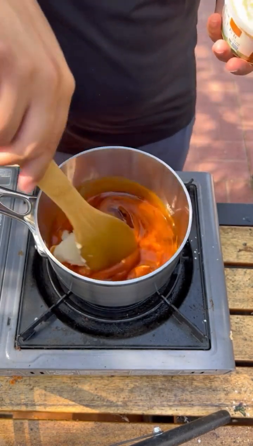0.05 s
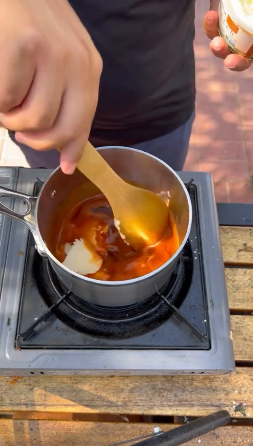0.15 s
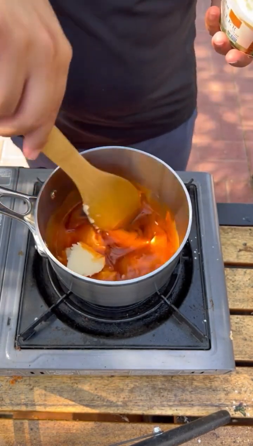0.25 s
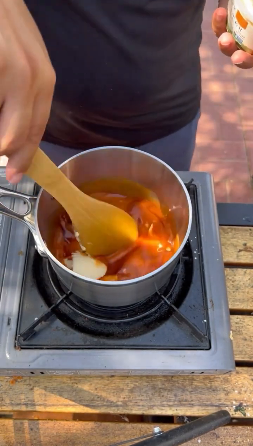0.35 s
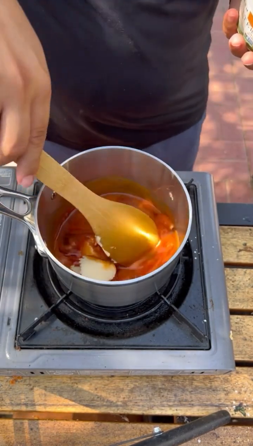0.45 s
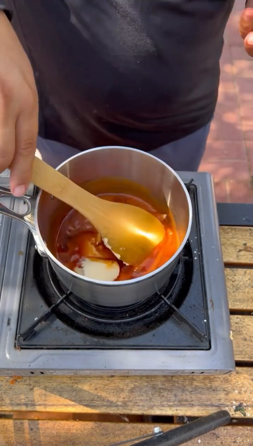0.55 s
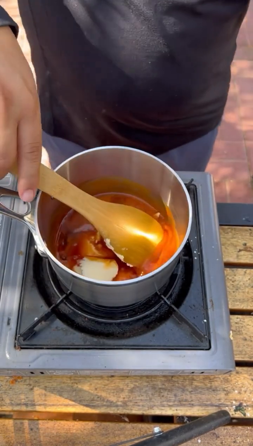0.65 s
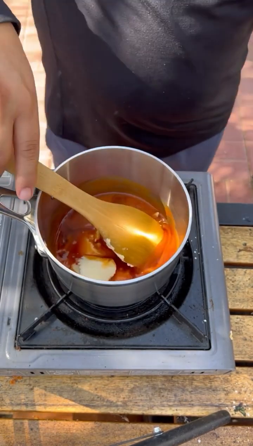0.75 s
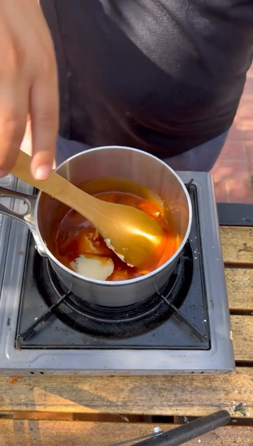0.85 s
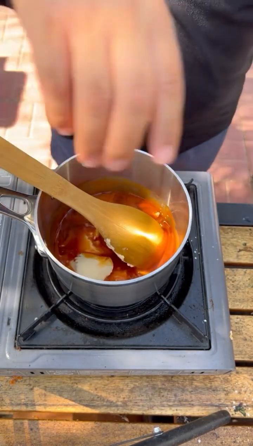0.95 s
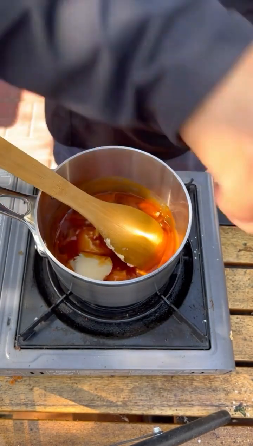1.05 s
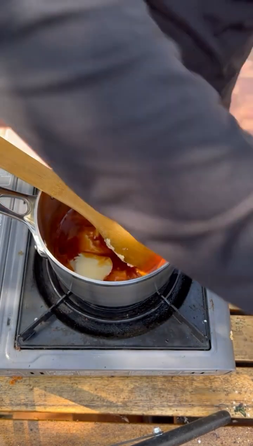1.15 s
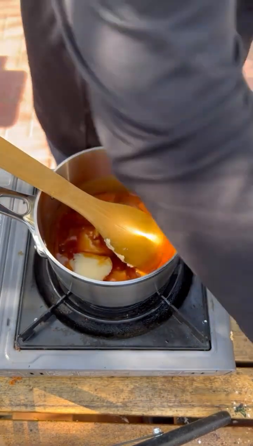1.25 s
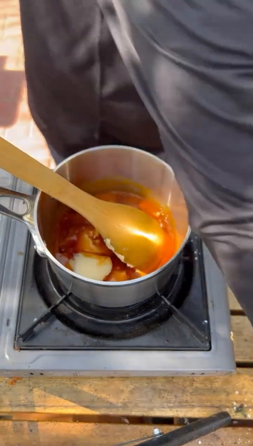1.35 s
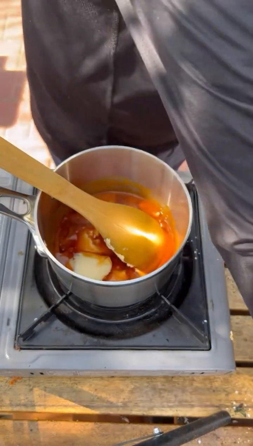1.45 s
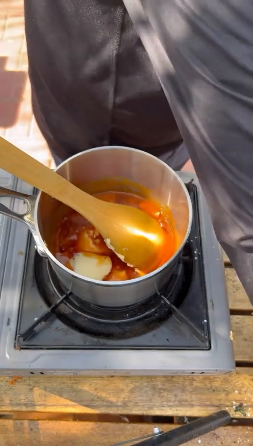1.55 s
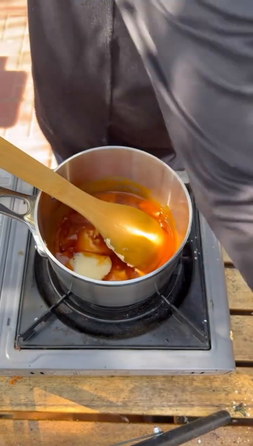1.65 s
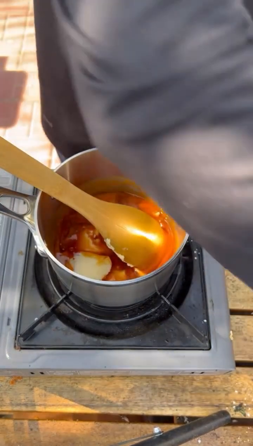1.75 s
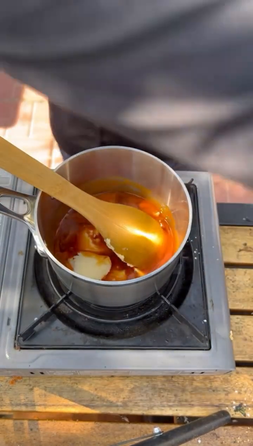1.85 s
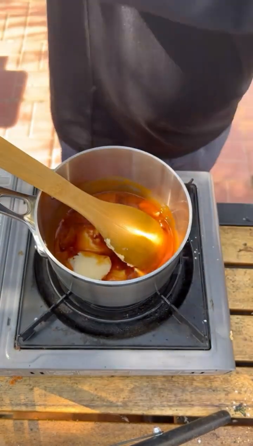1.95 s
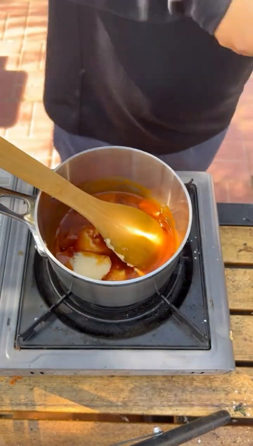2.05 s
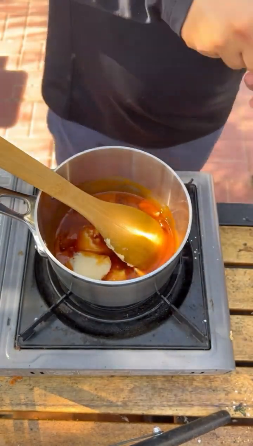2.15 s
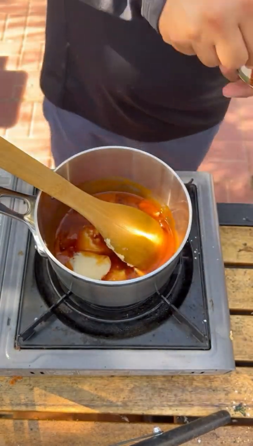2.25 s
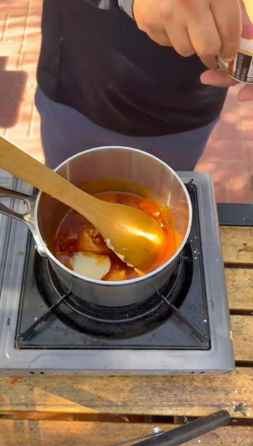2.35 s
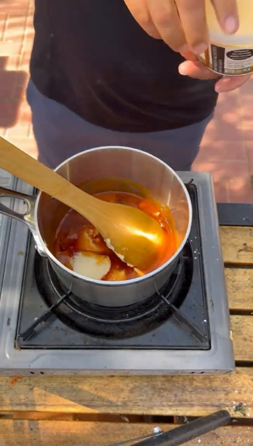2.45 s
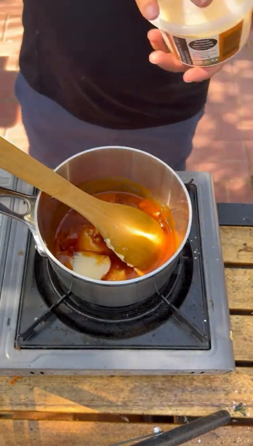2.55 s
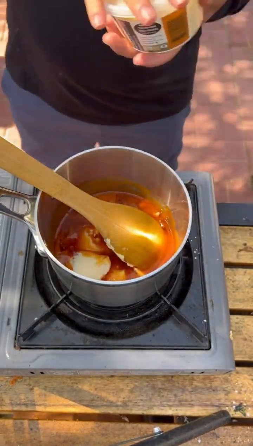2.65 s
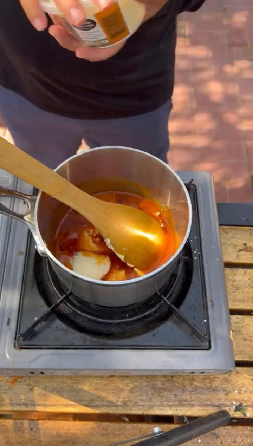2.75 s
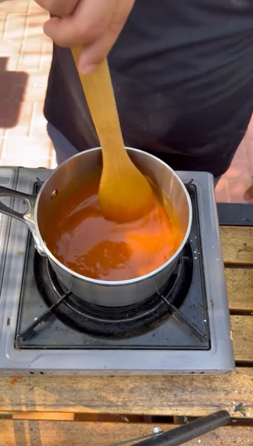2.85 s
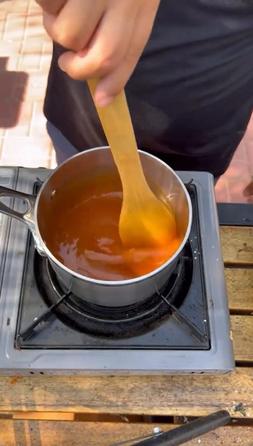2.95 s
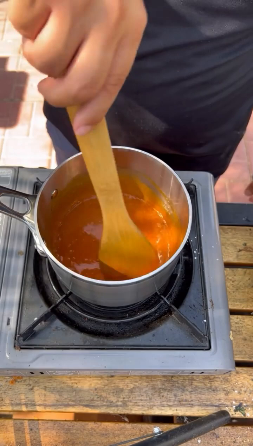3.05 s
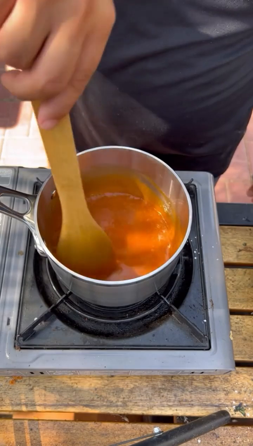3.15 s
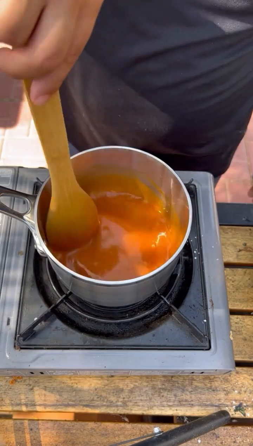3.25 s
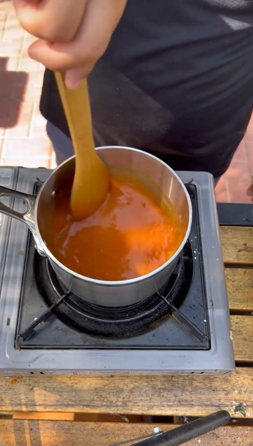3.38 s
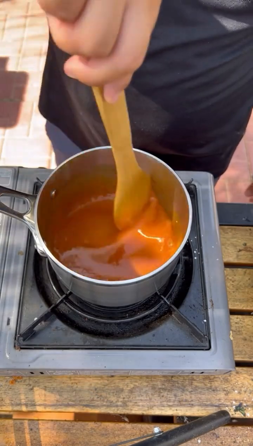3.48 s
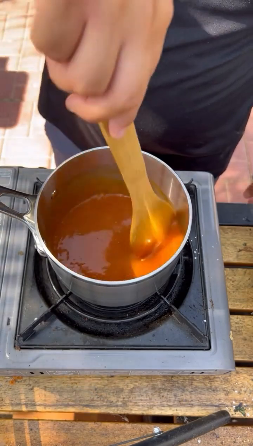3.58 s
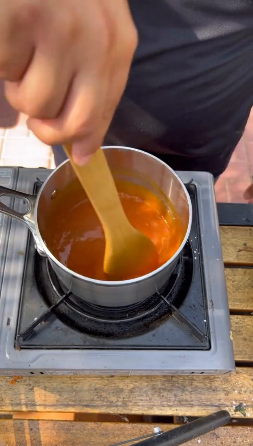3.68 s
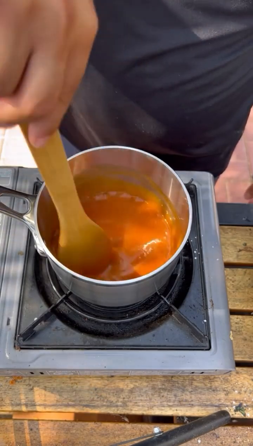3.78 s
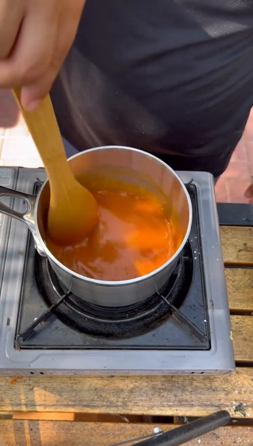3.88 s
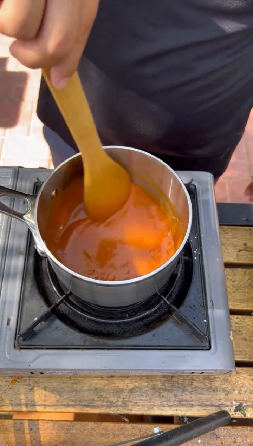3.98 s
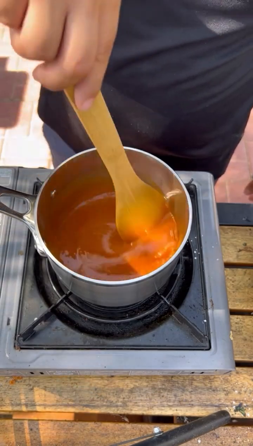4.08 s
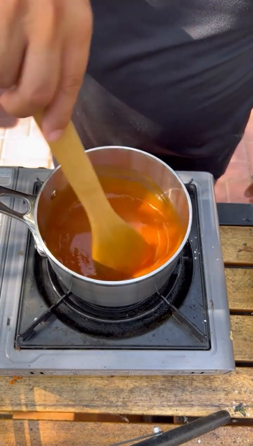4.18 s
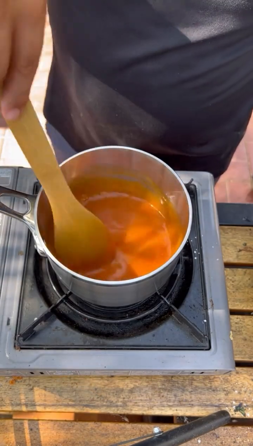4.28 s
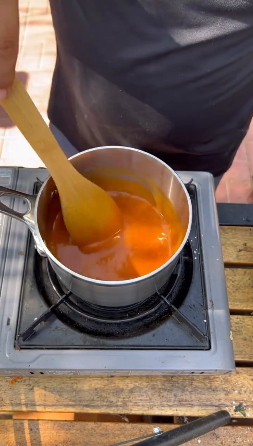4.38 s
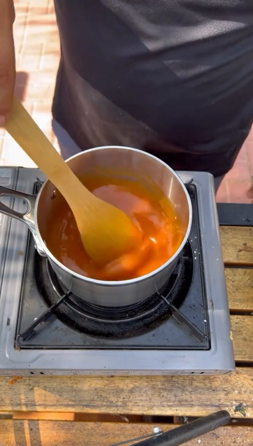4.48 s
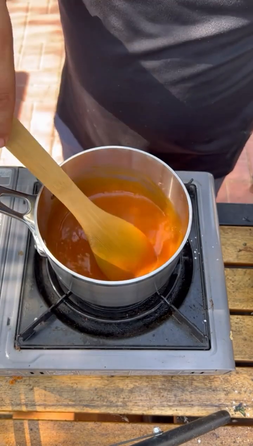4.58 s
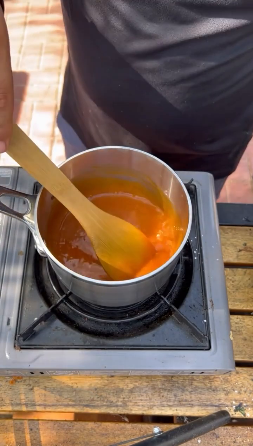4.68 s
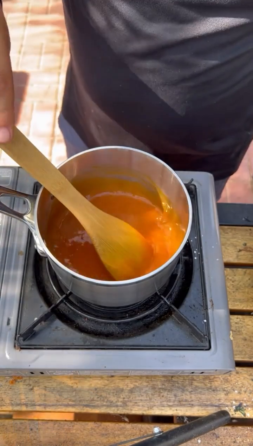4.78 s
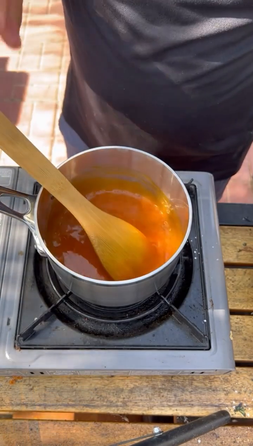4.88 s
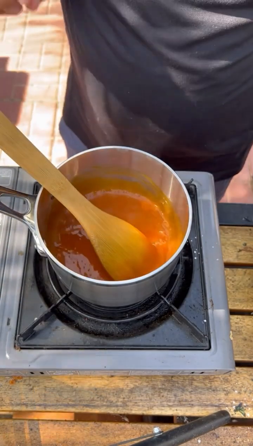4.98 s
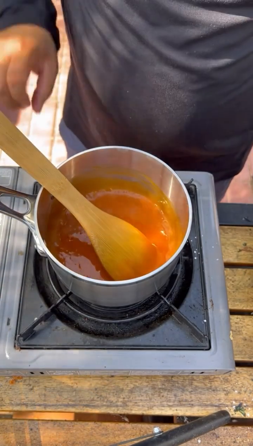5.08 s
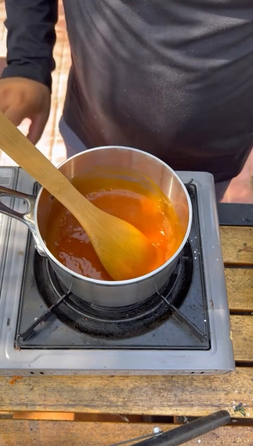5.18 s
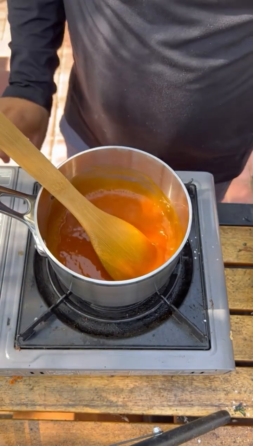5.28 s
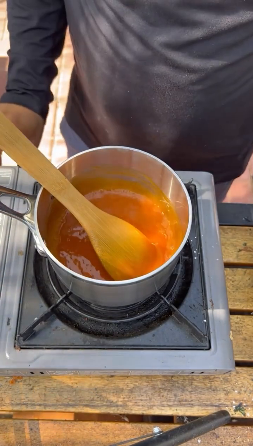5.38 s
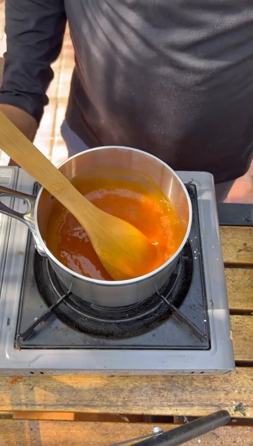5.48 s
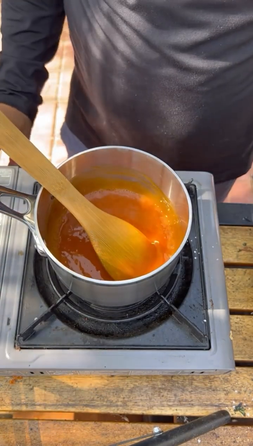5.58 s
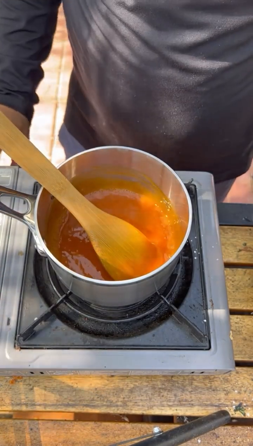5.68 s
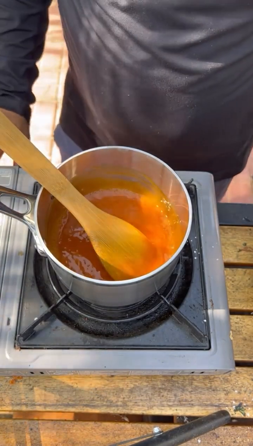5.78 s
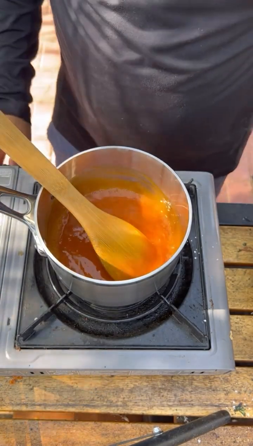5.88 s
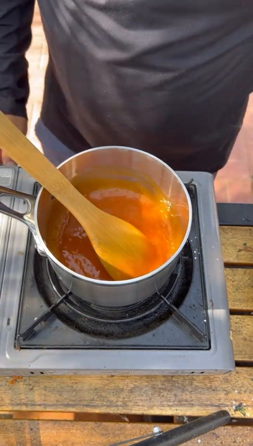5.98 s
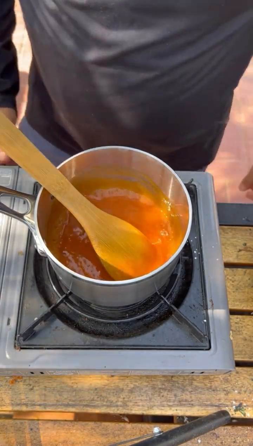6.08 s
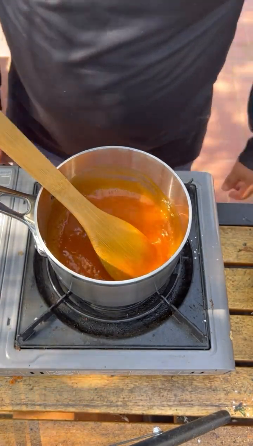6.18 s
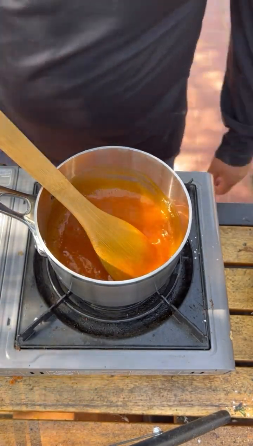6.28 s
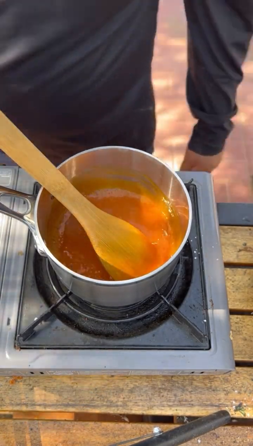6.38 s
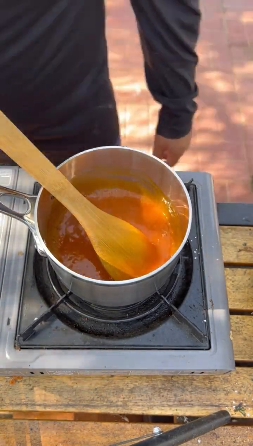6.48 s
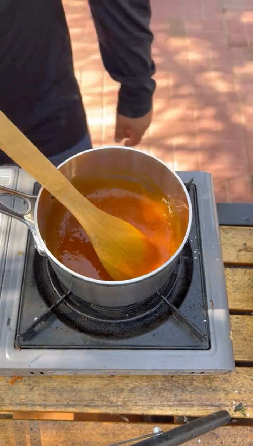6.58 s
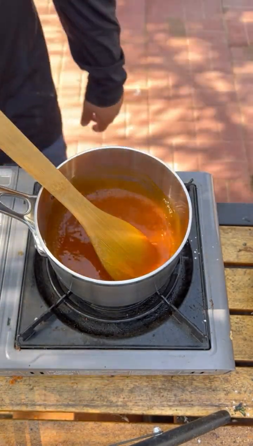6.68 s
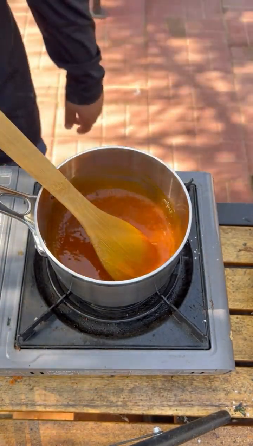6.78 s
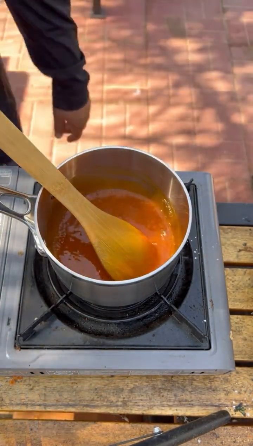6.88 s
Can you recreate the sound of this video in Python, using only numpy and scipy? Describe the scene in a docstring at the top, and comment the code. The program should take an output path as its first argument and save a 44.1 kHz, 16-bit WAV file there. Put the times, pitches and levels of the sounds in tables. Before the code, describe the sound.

Close outdoor stirring in a small steel saucepan: a spoon scrapes and knocks, then rests while sleeves brush and a small click sounds. A jar lid creaks and pops, stirring resumes with hollow wooden knocks and a double tap. Faint bird-like chirps and soft clicks follow, and a low gust buffets the microphone. A quiet machine hum and gas hiss lie behind.

```python
"""A wooden spoon stirs thick sauce in a steel saucepan: it knocks the wall (decaying sine modes) and drags
along it (grainy noise bands). Noise bursts make snaps and the gas knob's click; a jar lid creaks and pops
through resonances; sleeves brush; faint bird-like chirps are narrow gliding noise. Behind are gas hiss,
a machine's hum of three wavering lines, far hiss and rumble; low noise swells make a gust on the
microphone at the end."""
import sys
import numpy as np
from scipy import signal
from scipy.fft import rfft, irfft
from scipy.io import wavfile

SR = 44100
rng = np.random.default_rng(int(sys.argv[2]) if len(sys.argv) > 2 else 0)


def master_out(mix):
    """Clip the mix to full scale and print it as 16-bit PCM to the path in sys.argv[1]."""
    frames = np.transpose(np.atleast_2d(mix))
    ceiling = np.clip(frames, -1, 1)
    pcm = np.round(ceiling * 32767).astype(np.int16)
    wavfile.write(sys.argv[1], SR, pcm)


N = 305458


def amp(db):
    """Linear gain from dB."""
    return 10 ** (np.asarray(db, float) / 20)


def rms_one(x):
    """Scale to an overall rms of 1."""
    return x / np.sqrt(np.mean(x ** 2) + 1e-20)


def in_time(rows, outside=None):
    """Columns of a curve table, sample by sample."""
    time_s, *columns = np.transpose(rows)
    return [np.interp(np.arange(N) / SR, time_s, column, outside, outside) for column in columns]


def at_hz(points, hz):
    """Spectrum table read on a log frequency axis."""
    table_hz, table_db = np.array(points).T
    return np.interp(np.log(hz), np.log(table_hz), table_db)


def band(x, low_hz, high_hz, order=2):
    """Butterworth band-pass."""
    return signal.sosfilt(signal.butter(order, [low_hz, high_hz], "band", fs=SR, output="sos"), x)


def lowpass(x, cutoff_hz, order):
    """Butterworth low-pass."""
    return signal.sosfilt(signal.butter(order, cutoff_hz, fs=SR, output="sos"), x)


def drift(rate_hz):
    """Slow random signal of rms 1: noise through two equal poles at SR / 40, interpolated."""
    r = np.exp(-80 * np.pi * rate_hz / SR)
    white = rng.standard_normal(N // 40 + 2002)
    slow = signal.lfilter([1], [1, -2 * r, r * r], white)[2000:]   # settled part
    return np.interp(np.arange(N) / 40, np.arange(len(slow)), rms_one(slow))


def ring(x, hz, t60_s):
    """Two-pole resonator: a unit click rings a decaying sine of height 1."""
    r, w = amp(-60 / (t60_s * SR)), 2 * np.pi * hz / SR
    return signal.lfilter([0, np.sin(w)], [1, -2 * r * np.cos(w), r * r], x + 1e-18)


def swell(full_s, attack_s, hold_s, release_s):
    """Gain that climbs 20 dB per attack time, holds, and sinks 20 dB per release time."""
    t = np.arange(N) / SR - full_s
    db = np.minimum(20 * t / max(attack_s, .002), 0)
    db -= 20 * np.maximum(t - max(hold_s, 0), 0) / max(release_s, .002)
    gain = np.zeros(N)
    audible = db > -60
    gain[audible] = amp(db[audible])
    return gain


# stereo width of rumble, far hiss and gas: (frequency [Hz], side over mid [dB])
NOISE_WIDTH = [(30, -41), (125, -41), (240, -21), (400, -10.5), (1200, 0.5), (1800, -41), (2600, -4),
               (5000, -5.5), (7500, 1), (9400, -12), (11000, -11), (15000, -2.5)]


def wide_noise(spectrum):
    """Steady stereo noise of a given colour, its side share set by pitch; rms 1."""
    hz = np.maximum(np.fft.rfftfreq(N, 1 / SR), 1)
    mid, side = rfft(rng.standard_normal((2, N))) * amp(at_hz(spectrum, hz))
    side = side * amp(at_hz(NOISE_WIDTH, hz))
    return rms_one(irfft(mid + side * [[1], [-1]], N))


# far rumble colour: (frequency [Hz], relative level per Hz [dB])
RUMBLE_SPECTRUM = [(13, -56), (22, -16.5), (37, 1.5), (59, 2.5), (92, -1.5), (209, -7), (240, -8),
                   (264, -5.5), (294, -8.5), (427, -13), (640, -18), (771, -31.5), (900, -24),
                   (1170, -47.5), (1980, -120)]
# rumble: (time [s], level [dB])
RUMBLE_LEVEL = [(0.0, -45), (0.77, -47.5), (2.6, -47), (3.07, -49), (3.97, -47), (4.32, -49), (4.75, -49),
                (6.21, -51), (6.93, -53.5)]


def rumble():
    """Far rumble: coloured noise under a slow level curve."""
    return amp(in_time(RUMBLE_LEVEL)[0]) * wide_noise(RUMBLE_SPECTRUM)


# far hiss colour: (frequency [Hz], relative level per Hz [dB])
YARD_SPECTRUM = [(180, -42), (300, -10.5), (348, 4.5), (384, -19), (663, -13), (745, -1), (908, -10),
                 (986, 0.5), (3190, -15.5), (15600, -48)]
YARD_DB = -65


def yard():
    """Far hiss of the yard: steady coloured noise."""
    return amp(YARD_DB) * wide_noise(YARD_SPECTRUM)


# gas hiss colour: (frequency [Hz], relative level per Hz [dB])
GAS_SPECTRUM = [(880, -20.5), (1500, 5), (1860, -9), (2240, 5), (2420, -8.5), (3160, -6), (4810, -3.5),
                (5360, -4), (5520, -4), (6090, -3), (7120, -10.5), (9280, -0.5), (10100, -6.5),
                (11500, -45.5), (15600, -17)]
# gas hiss: (time [s], level before flicker [dB])
BURNER_LEVEL = [(0, -68), (1.4, -67.5), (2.83, -68), (2.86, -59.5), (4.6, -65.5), (5.78, -64.5),
                (5.86, -74.5), (5.93, -78.5), (7, -72)]


def burner():
    """Gas hiss: coloured noise with a level curve and random flicker."""
    flicker_db = 2.3 * drift(16.5)
    return amp(in_time(BURNER_LEVEL)[0] + flicker_db) * wide_noise(GAS_SPECTRUM)


# machine lines: (frequency [Hz], waver rate [Hz], level [dB])
HUM_LINES = [(58.05, 3.2, -53), (118.8, 7.4, -59.5), (239.3, 1.4, -54)]


def hum():
    """Machine lines: a steady sine with a narrow wavering halo."""
    t, out = np.arange(N) / SR, 0
    for hz, waver_hz, level_db in HUM_LINES:
        waver = 1 + .17 * (drift(waver_hz) + 1j * drift(waver_hz))
        out = out + amp(level_db) * rms_one(np.real(waver * np.exp(2j * np.pi * hz * t)))
    return out


# wind alike at both ports: (time of full level [s], level [dB])
GUST_PUFFS = [(6.46, -38.5), (6.515, -29.5), (6.596, -28), (6.774, -37), (6.906, -37)]
PUFF_ATTACK_S, PUFF_HOLD_S, PUFF_RELEASE_S = .05, 0.0029, .08
# wind opposite at the two ports: (time [s], level [dB])
BREEZE_LEVEL = [(5.15, -95), (5.3, -82.5), (5.6, -61.5), (5.9, -67.5), (6.1, -98.5), (6.4, -74),
                (6.93, -45)]


def gust():
    """Lumpy low pressure swings on the microphone ports."""
    common, unlike = rms_one(band(rng.standard_normal((2, N)), 48.3, 79.4))
    puffs = sum(amp(db) * swell(s, PUFF_ATTACK_S, PUFF_HOLD_S, PUFF_RELEASE_S) for s, db in GUST_PUFFS)
    breeze = amp(in_time(BREEZE_LEVEL, outside=-150)[0])
    return puffs * common + breeze * unlike * [[1], [-1]]


# faint bird-like chirps, gliding in pitch:
# (time of full level [s], hold [s], first centre [Hz], last centre [Hz], relative level [dB])
CHIRPS = [(.828, 0.098, 3650, 4240, -68), (1.76, 0.022, 4500, 4000, -72), (1.845, 0.031, 3820, 3850, -72),
          (2.237, 0.034, 3700, 3620, -66), (5.15, .04, 5300, 5370, -65), (5.229, 0.032, 5500, 4970, -64),
          (5.259, 0.085, 4200, 3870, -57.5), (5.36, 0.056, 4700, 4030, -54.5),
          (5.437, 0.04, 3700, 3820, -51.5), (5.642, 0.036, 5400, 5160, -67),
          (5.712, .04, 4600, 4600, -68.5), (6.308, 0.042, 2650, 2600, -61)]
CHIRP_ATTACK_S, CHIRP_RELEASE_S = 0.012, 0.077


def chirps():
    """Faint chirps: two narrow strands of noise around a gliding centre, throbbing apart."""
    wobble = lowpass(rng.standard_normal((4, N)), 300, order=2)
    throbs = [amp(4 * drift(30)), amp(4 * drift(30))]
    out = np.zeros((2, N))
    for s, hold_s, first_hz, last_hz, level_db in CHIRPS:
        gain = amp(level_db - 4.0) * swell(s, CHIRP_ATTACK_S, hold_s, CHIRP_RELEASE_S)
        on = np.flatnonzero(gain)
        centre_hz = np.interp(on / SR, [s, s + hold_s], [first_hz, last_hz])
        for throb, ratio in zip(throbs, (.92, 1.1)):
            phase = 2 * np.pi * np.cumsum(ratio * centre_hz) / SR
            strand = wobble[:2, on] * np.cos(phase) + wobble[2:, on] * np.sin(phase)
            mid, side = rms_one(strand)
            out[:, on] += (gain * throb)[on] * (mid + amp(-5.0) * side * [[1], [-1]])
    return out


# jar lid resonances: (frequency [Hz], half width [Hz], relative level [dB])
LID_MODES = [(2124, 120, -6), (4804, 150, -2), (5530, 98, -3.5), (5760, 75, -7.5), (6150, 240, -12),
             (8070, 93, -6), (9194, 47, 2.5), (10900, 110, -17.5), (14200, 930, -13.5)]
# lid creak: (time [s], relative level [dB])
LID_CREAK = [(2.829, -52.5), (2.838, -31.5), (2.8386, -29), (2.8405, -9.5), (2.8445, -27.5),
             (2.8475, -53.5)]
# air in the jar: (start [s], frequency [Hz], level [dB], time where the pop is cut off [s])
JAR_POP = (2.8408, 445, -23.5, 2.8472)


def lid():
    """The lid creaks over the jar's lip into its resonances, then the trapped air pops."""
    white = rng.standard_normal(N)
    tone = 0
    for hz, half_width_hz, level_db in LID_MODES:
        mode = band(white, hz - half_width_hz, hz + half_width_hz, order=1)
        tone = tone + amp(level_db) * rms_one(mode)
    creak = amp(in_time(LID_CREAK, outside=-150)[0]) * rms_one(tone)
    start_s, pop_hz, pop_db, cut_s = JAR_POP
    t = np.arange(N) / SR
    rise = np.clip((t - start_s) / .003, 0, 1) * (t < cut_s)
    return creak + amp(pop_db) * rise * np.sin(2 * np.pi * pop_hz * (t - start_s))


# knob and other snaps: (time [s], starting gain [dB], t60 [s], bass [dB], middle [Hz], middle [dB],
#                        treble [Hz], treble [dB]); band levels relative
SNAP_EVENTS = [(0.573, -41.5, 0.077, -27, 2190, -3.5, 6800, -12.5),
               (1.486, -50, 0.056, -16, 1780, -5.5, 4010, -12),
               (2.182, -21, 0.018, -42, 1480, -10, 4700, -6.5),
               (2.632, -42, 0.056, -7.5, 1380, -31, 4250, -14),
               (4.361, -38.5, 0.05, -17, 1320, -21, 6810, -13),
               (4.498, -40, 0.19, -25, 2620, -6.5, 6100, -18),
               (5.796, -44, 0.12, -13, 2900, -13.5, 4620, -13.5),
               (5.883, -29.5, 0.16, -12, 1980, -11.5, 5600, -20),
               (5.946, -30, 0.1, -10.5, 2200, -5.5, 3680, -12),
               (6.55, -42, 0.15, -33, 2360, -8.5, 6540, -18.5)]


def snaps():
    """Short noise bursts, each with its own decay and colour."""
    out, t = np.zeros(N), np.arange(SR // 8) / SR
    for s, peak_db, t60_s, bass_db, middle_hz, middle_db, treble_hz, treble_db in SNAP_EVENTS:
        white = rng.standard_normal((3, len(t)))
        burst = amp(bass_db) * rms_one(band(white[0], 290, 1000))
        burst += amp(middle_db) * rms_one(band(white[1], middle_hz / 1.28, middle_hz * 1.14, order=1))
        burst += amp(treble_db) * rms_one(band(white[2], treble_hz / 1.29, treble_hz * 1.5, order=3))
        start = int(s * SR)
        out[start:start + len(t)] += amp(peak_db - 60 * t / t60_s) * burst
    return lowpass(out, 11000, order=4)


# drags and brushes: (time of full level [s], attack [s], hold [s], release [s], level 2.5-6 kHz [dB],
#                     dull part re that [dB], bright part re that [dB])
RUB_EVENTS = [(0.044, 0.0078, 0.015, 0.19, -51, -6, -2.5), (0.283, 0.06, 0.0091, 0.035, -55.5, -5, 2.5),
              (0.318, 0.018, 0.09, 0.062, -48, -9.5, 1), (0.472, .02, .01, 0.14, -69, -1, 2),
              (0.575, .01, .02, 0.066, -66, 5, -26), (0.838, .05, 0.089, .05, -81, -10, -17),
              (0.998, 0.034, .005, 0.058, -57.5, 4, -12), (1.242, 0.18, .005, .1, -66.5, -10, -13),
              (1.583, 0.046, 0.052, .03, -58, 4.5, -20), (1.62, 0.035, 0.025, .02, -65.5, 3, 7),
              (2.266, 0.11, 0.0063, .07, -60, -11, -13), (2.651, 0.014, .005, 0.023, -58, 4, -16),
              (2.79, 0.2, .005, 0.12, -59.5, -2, -10), (2.974, 0.083, 0.058, 0.03, -54.5, -3, 3),
              (3.052, .02, 0.086, 0.056, -64, 0, 0.5), (3.328, 0.041, .005, 0.021, -55.5, -1, 4),
              (3.584, 0.049, .005, 0.048, -50.5, -4, -4.5), (3.628, .02, 0.09, .03, -71, 8, -16),
              (3.746, 0.025, .005, 0.16, -59, -2, -2), (4.107, .1, .005, 0.21, -53, 2, 0.5),
              (4.252, 0.04, .005, 0.11, -62, -23, 3), (4.092, 0.0088, 0.0039, 0.011, -61, -13, 8),
              (4.293, 0.038, 0.063, .05, -73, 6, 3), (4.392, 0.03, .005, .17, -48, -9.5, -4),
              (4.519, 0.087, 0.044, 0.038, -52.5, -0.3, 1.5), (5.959, .006, .005, 0.13, -66, 14.5, -17),
              (6.314, .02, 0.06, .06, -65, 3.5, -12), (6.4, .05, 0.11, .05, -69.5, 3.5, -6),
              (6.52, 0.013, .05, .08, -63.5, -0.5, -16), (6.867, 0.037, 0.02, 0.061, -57.5, 6, -10)]
# spans where drags also ring the pan modes: (from [s], to [s])
PAN_RING_SPANS = [(.2, 0.6), (2.85, 4.2)]
# pan wall modes, also for knocks():
# (frequency [Hz], shape number: sets which places on the wall leave the mode weak)
PAN_MODES = [(649, 6), (1189, 6), (1398, 1), (1561, 4), (2143, 2), (2379, 6), (2747, 8), (3334, 8),
             (4005, 4), (8990, 5)]
# ring of each wall mode: (relative level [dB], free t60 [s])
PAN_MODE_RING = [(1.5, .45), (-10.5, .55), (-6, 0.53), (-10.5, .25), (-17.5, 0.3), (-9.5, .25),
                 (-3.5, 0.18), (-14.5, .32), (-23.5, 0.23), (-35, .5)]
RUB_TILT_DB_PER_OCTAVE, TOP_UNDER_BRIGHT_DB = -3, 11


def rubs():
    """Dense uneven grains of friction in narrow bands that flicker apart; some also ring the pan modes."""
    spike_db = 3.94 * np.minimum(rng.exponential(1, (2, N)), 5)
    grains = rng.standard_normal((2, N)) * amp(spike_db * (rng.random((2, N)) < .05))
    grains *= amp(0.91 * drift(90))   # stick and slip
    parts = []
    for low_hz, high_hz in [(2500, 6000), (700, 2500), (6000, 10500), (11000, 15500)]:
        edges_hz = np.geomspace(low_hz, high_hz, 5)
        patches = 0
        for a, b in zip(edges_hz, edges_hz[1:]):
            tilt_db = RUB_TILT_DB_PER_OCTAVE * np.log2(a / low_hz)
            patches = patches + band(grains, a, b) * amp(1.8 * drift(25) + tilt_db)
        parts.append(rms_one(patches))
    gains = np.zeros((4, N))
    for s, attack_s, hold_s, release_s, level_db, dull_db, bright_db in RUB_EVENTS:
        colour = amp([0, dull_db, bright_db, bright_db - TOP_UNDER_BRIGHT_DB])
        gains += np.outer(amp(level_db) * colour, swell(s, attack_s, hold_s, release_s))
    mid, other = sum(gain * part for gain, part in zip(gains, parts))
    t = np.arange(N) / SR
    rings_pan = sum((t > a) & (t < b) for a, b in PAN_RING_SPANS)
    body = 0
    for (hz, _), (_, t60_s) in zip(PAN_MODES, PAN_MODE_RING):
        body = body + ring(rings_pan * mid, hz, .4 * t60_s)   # the touching spoon shortens the ring
    side = band(other, 6200, 8800) + band(other, 10500, 15500)   # wider in the treble
    return mid + amp(-46.0) * body + amp(-4.5) * side * [[1], [-1]]


TILT_FROM_HZ, TILT_UP_TO_HZ = 1500, 4100


def struck(hz, db, shape_number, tilt_db_per_octave, place):
    """Mode heights for one blow: tilted in pitch, weak for modes whose shape is small at the place."""
    shape = np.abs(np.sin(np.pi * np.asarray(shape_number) * place)) + .05
    octaves = np.log2(np.minimum(hz, TILT_UP_TO_HZ) / TILT_FROM_HZ)
    return amp(db + tilt_db_per_octave * octaves) * shape


# knocks and one soft bump (1.61 s):
# (time [s], wood [dB], wood tilt [dB/octave], place on wood [0-.5], wood t60 [s],
#  wall [dB], wall tilt [dB/octave], place on wall [0-.5],
#  delay until the wall is damped [s], crack [dB], rattle [dB]); starting gains
KNOCK_EVENTS = [(0.0447, -24.5, -7, 0.15, 0.041, -50, -5.0, 0.085, 0.042, -47, -42),
                (0.13, -48.5, 7.9, 0.267, 0.03, -53, 2, 0.19, 0.026, -58, -62.0),
                (0.1685, -20, 5, 0.427, 0.042, -31.5, -8.5, 0.495, 0.091, -44, -54),
                (0.634, -35.5, -4.5, 0.27, 0.024, -51, -4, 0.125, 0.013, -62, -58.0),
                (1.61, -43.5, 5.5, 0.13, 0.067, -68, -2, 0.16, 0.024, -50.5, -49),
                (3.177, -21.5, -0.4, 0.16, 0.016, -43, -5, 0.27, 0.089, -38.5, -40),
                (3.3879, -14.5, 2.5, 0.29, 0.014, -36, 5, 0.2, 0.15, -32.5, -33.5),
                (3.813, -25, -5, 0.098, 0.013, -41, 0.5, 0.266, 0.14, -55, -40.5),
                (4.0099, -29, 17.5, 0.1, 0.023, -31, 7.5, 0.24, 0.16, -43.5, -49),
                (4.76, -17.5, -2.5, 0.18, 0.017, -36, 3.5, 0.135, 0.063, -41.5, -33),
                (4.824, -24, 5.5, 0.22, 0.012, -44, 6.5, 0.38, 0.079, -54, -36.5)]
# spoon modes: (frequency [Hz], relative level [dB])
SPOON_MODES = [(695.0, -9.5), (990.0, -5), (1242.0, -3.5), (1470.0, 0.0), (1800.0, -8), (2226.0, -5.5),
               (2494.0, -6.5), (2995.0, -15), (3540.0, -15.5), (4080.0, -20.5)]
THUD_OVER_RATTLE_DB, WOOD_ROUGH = 9, 0.35


def knocks():
    """Knocks and a soft bump: short wood modes, longer wall modes, with crack, thud and rattle."""
    out, t = np.zeros(N), np.arange(SR // 2) / SR
    wood_hz, wood_mode_db = np.transpose(SPOON_MODES)
    wall_hz, wall_shape = np.transpose(PAN_MODES)
    wall_mode_db, ring_s = np.transpose(PAN_MODE_RING)
    order = np.arange(1, len(SPOON_MODES) + 1)
    wood_sines = np.sin(2 * np.pi * np.outer(wood_hz, t))
    wall_phase = 2 * np.pi * np.outer(wall_hz, t)
    wall_decay = amp(-60 * t / ring_s[:, None])
    for (s, wood_db, wood_tilt, wood_place, wood_t60_s, wall_db, wall_tilt, wall_place,
         damped_s, crack_db, rattle_db) in KNOCK_EVENTS:
        white = rng.standard_normal((2, len(t)))
        heights = struck(wood_hz, wood_db + wood_mode_db, order, wood_tilt, wood_place) * (-1) ** order
        wood = amp(-60 * t / wood_t60_s) * (heights @ wood_sines)
        wood *= np.minimum(t / 0.00017, 1)   # wood gives: soft contact
        wood *= 1 + WOOD_ROUGH * rms_one(band(white[1], 72, 500))   # the contact chatters
        # the handle splits each wall mode into a beating pair
        pairs = np.sin(wall_phase) + 0.19 * np.sin(1.012 * wall_phase + white[0, :len(wall_hz), None])
        heights = struck(wall_hz, wall_db + wall_mode_db, wall_shape, wall_tilt, wall_place)
        wall = heights @ (wall_decay * pairs)
        # spoon or sauce damps the wall
        wall *= np.minimum(t / 0.0054, 1) * amp(-60 * np.maximum(t - damped_s, 0) / 0.14)
        crack = amp(crack_db - 60 * t / 0.036) * rms_one(band(white[0], 4800, 8800, order=3))
        thud = amp(rattle_db + THUD_OVER_RATTLE_DB - 60 * t / 0.017) * np.sin(2 * np.pi * 430 * t)
        thud *= np.minimum(t / 0.0037, 1)
        # pan shaking on its grate
        rattle = amp(rattle_db - 60 * t / 0.11) * rms_one(band(white[1], 284, 1660))
        start = int(s * SR)
        out[start:start + len(t)] += wood + wall + crack + thud + rattle
    return out


def echoes(x):
    """A few dull returns from table and walls, different on each side."""
    out = np.zeros((2, N))
    lags = (rng.uniform(0.00103, .04, 12) * SR).astype(int)
    for k, lag in enumerate(lags):
        out[k % 2, lag:] += amp(-300 * lag / SR) * x[:-lag] * (-1) ** (k // 2)
    return band(out, 300, 8900)


# stereo width of single sources: (frequency [Hz], side over mid [dB])
PORT_WIDTH = [(30, -45.5), (125, -47), (240, -17.5), (400, -15.5), (1500, -21.5), (4000, -14.5),
              (6000, -1.5), (7800, -5), (9300, -14), (10500, -15.5), (14000, -0.5)]


def ports(x):
    """Two close microphone ports hear a source with opposite phase shifts, their size set by pitch."""
    hz = np.maximum(np.fft.rfftfreq(N, 1 / SR), 1)
    side = irfft(1j * amp(at_hz(PORT_WIDTH, hz)) * rfft(x), N)
    return x + side * [[1], [-1]]


def scene():
    """Sum of all sources, stereo."""
    near = knocks() + snaps()
    background = rumble() + yard() + burner()
    single = ports(near + lid() + hum())
    return single + amp(-20.0) * echoes(near) + rubs() + chirps() + gust() + background


CUTOFF_HZ = 16600


def record(dry):
    """The deepest bass and the top are cut."""
    dry = signal.sosfilt(signal.butter(3, 36, "high", fs=SR, output="sos"), dry)
    return signal.sosfilt(signal.cheby2(12, 70, CUTOFF_HZ, fs=SR, output="sos"), dry)


dry = scene()
out = record(dry)
master_out(out)
```